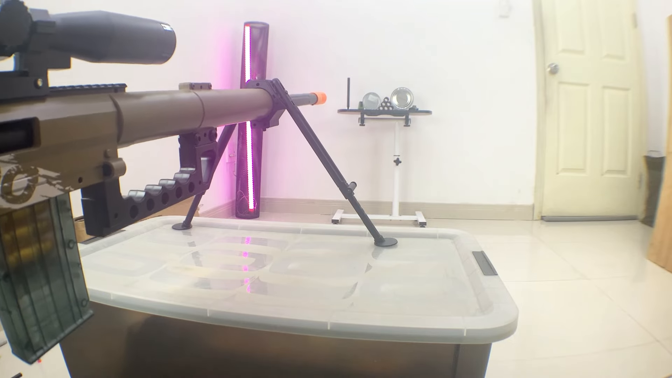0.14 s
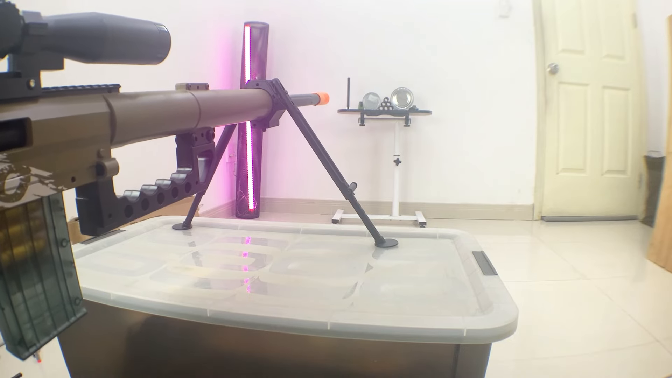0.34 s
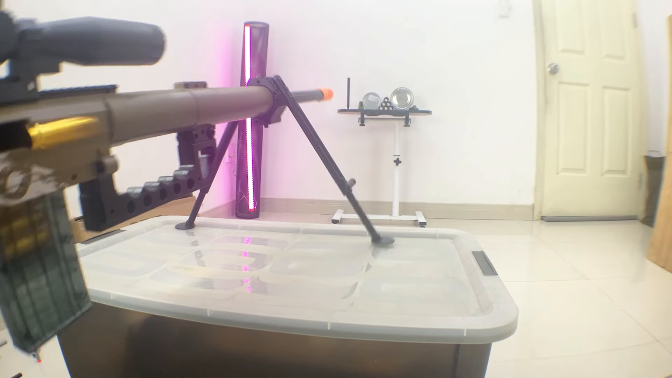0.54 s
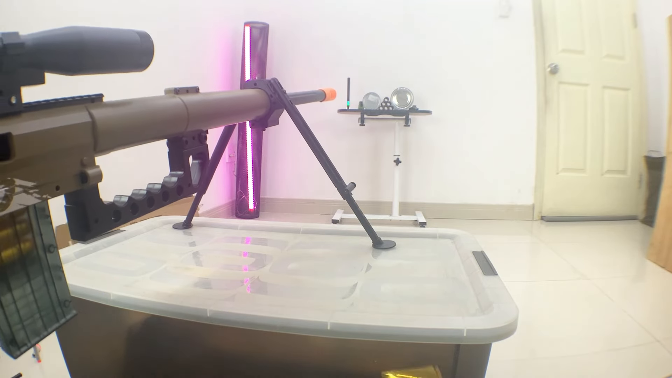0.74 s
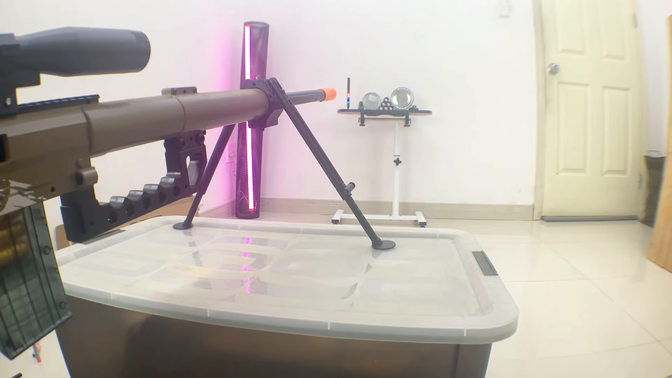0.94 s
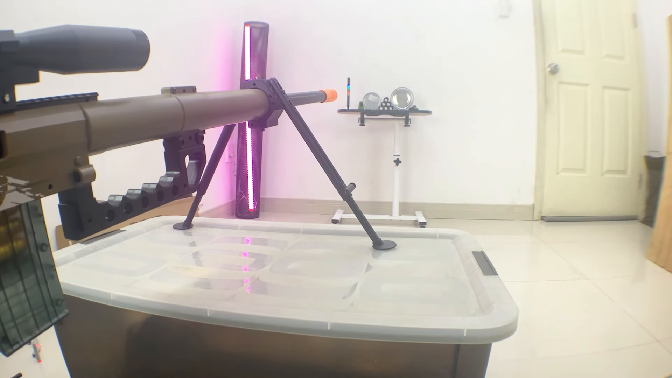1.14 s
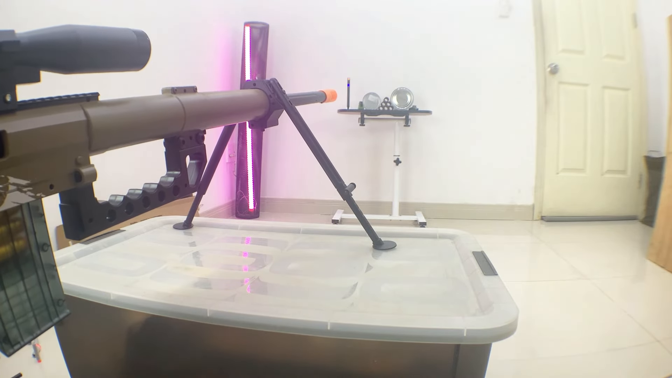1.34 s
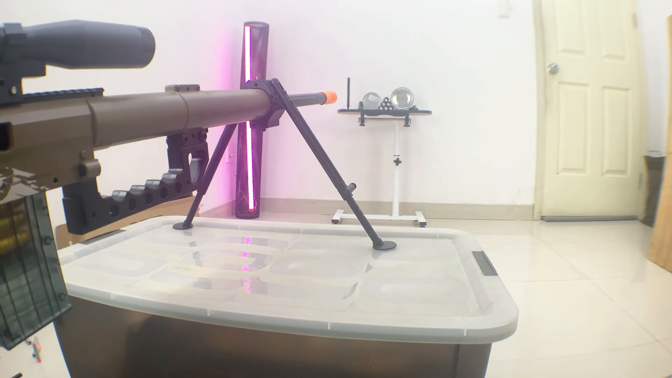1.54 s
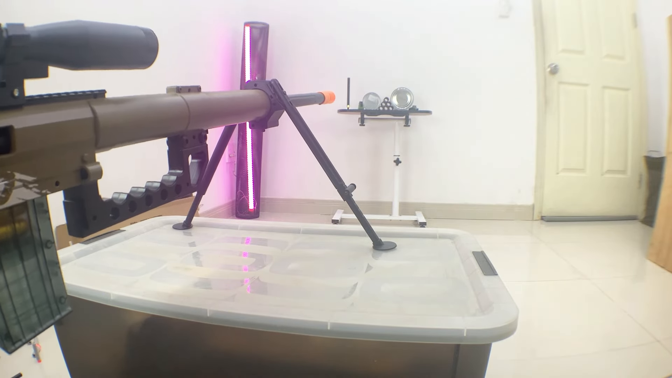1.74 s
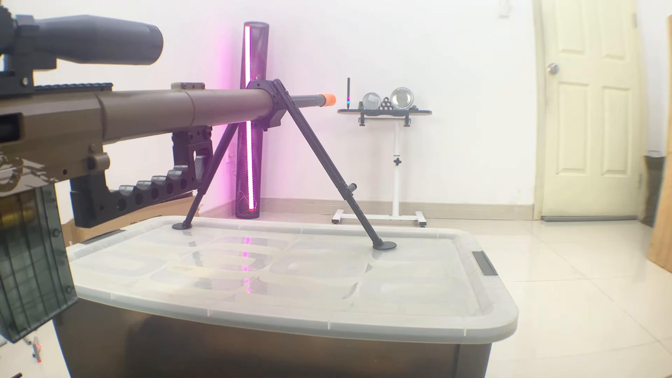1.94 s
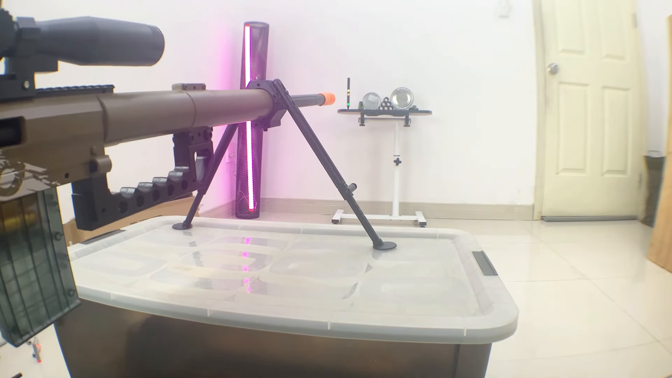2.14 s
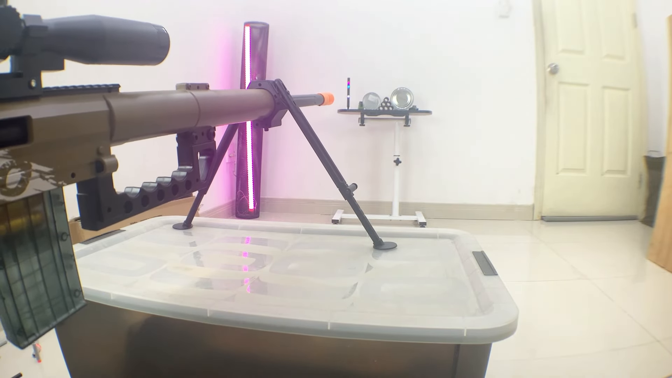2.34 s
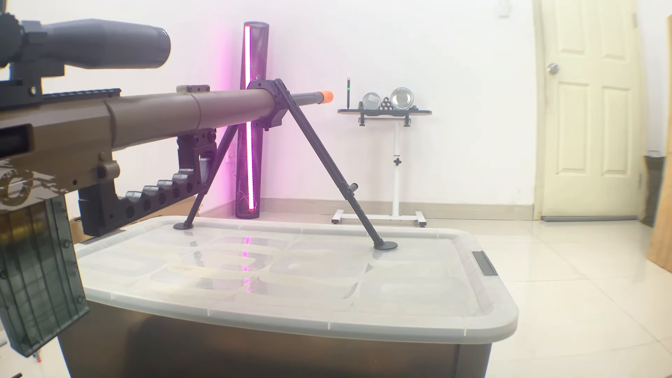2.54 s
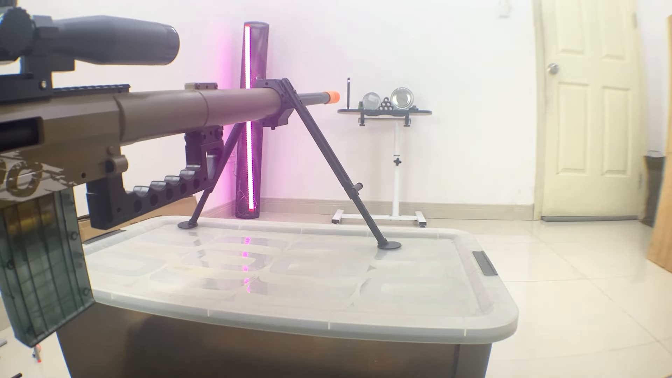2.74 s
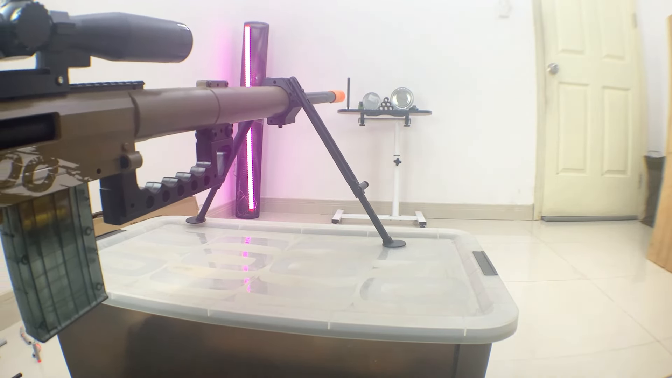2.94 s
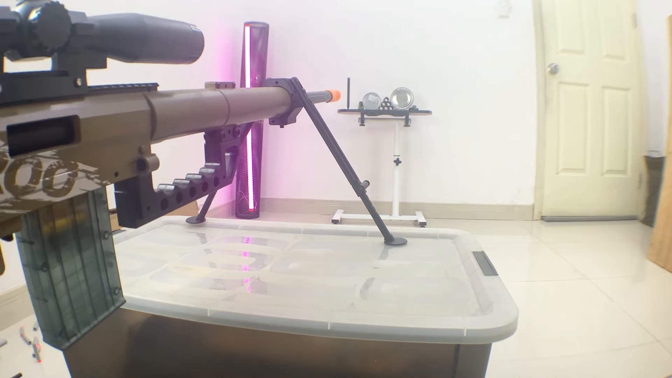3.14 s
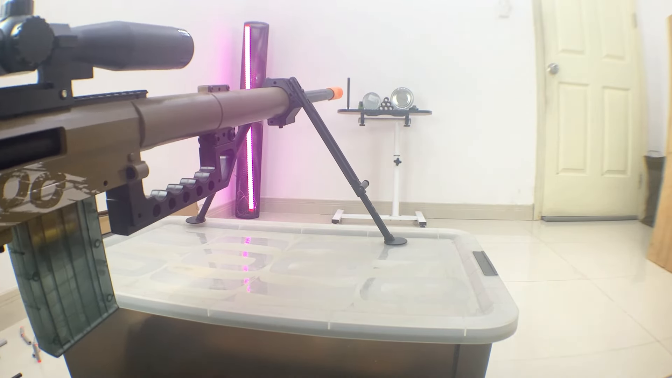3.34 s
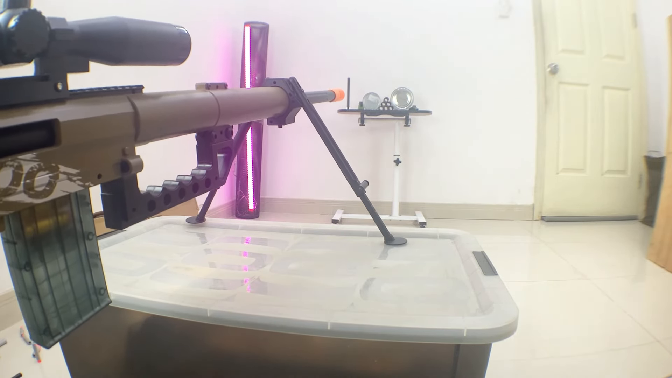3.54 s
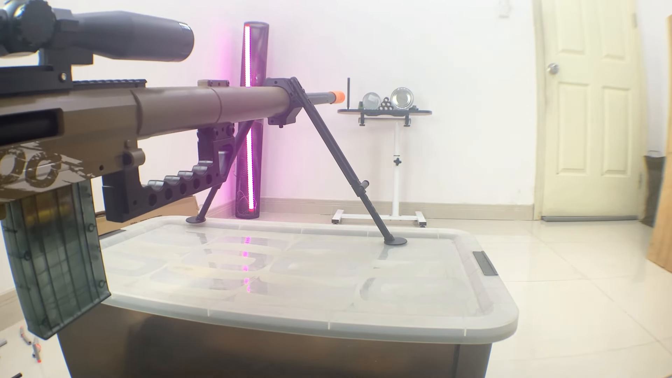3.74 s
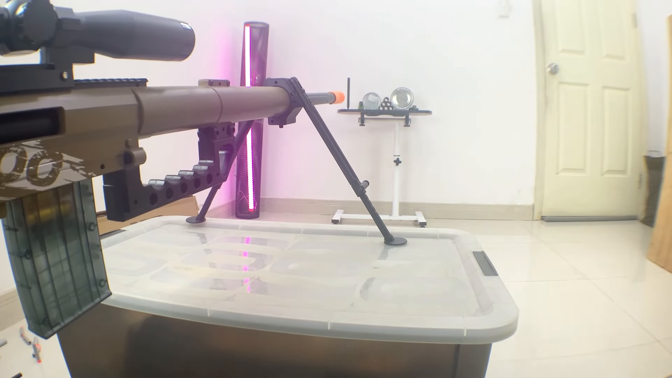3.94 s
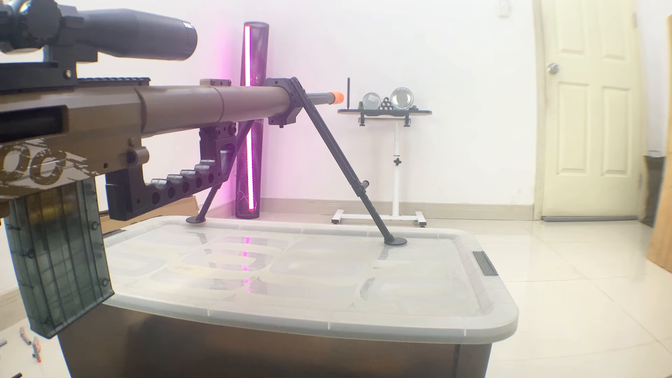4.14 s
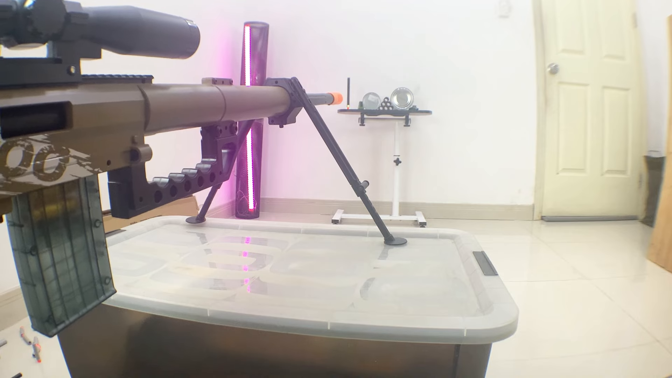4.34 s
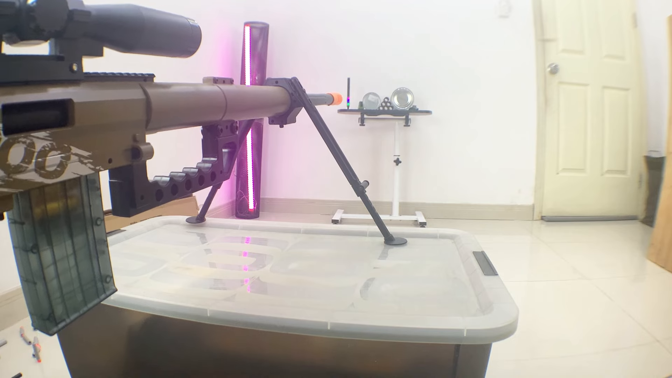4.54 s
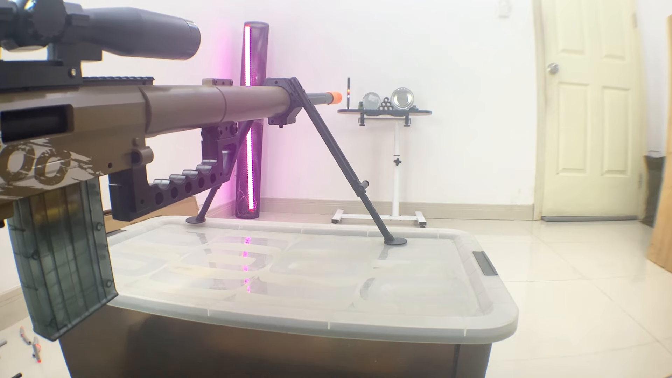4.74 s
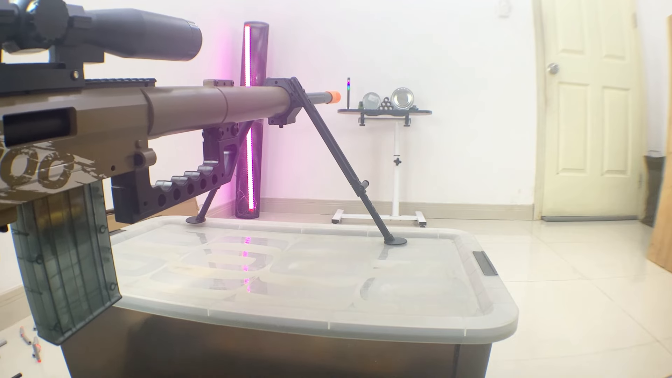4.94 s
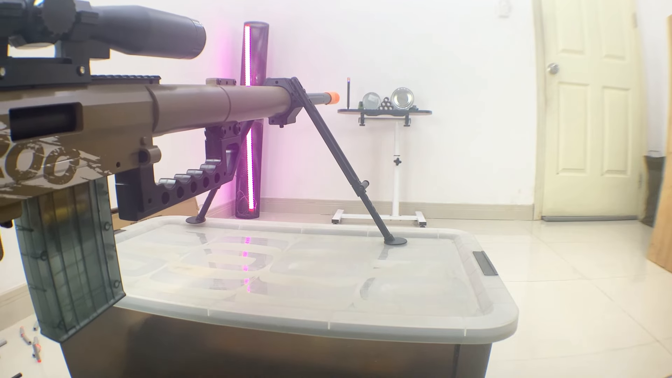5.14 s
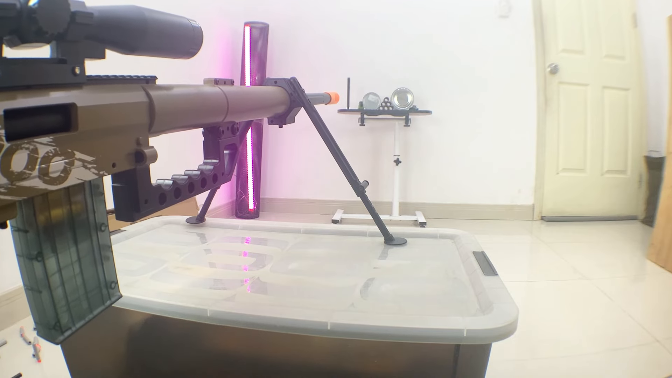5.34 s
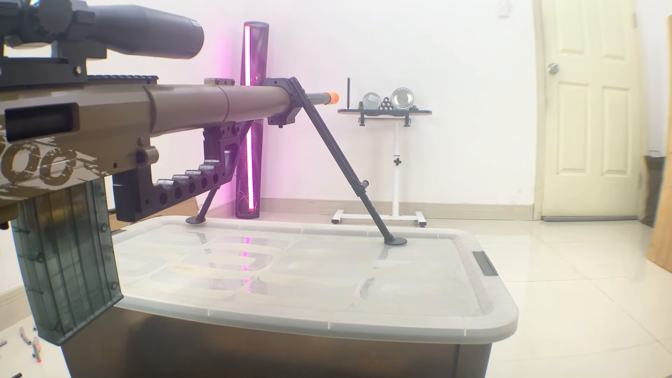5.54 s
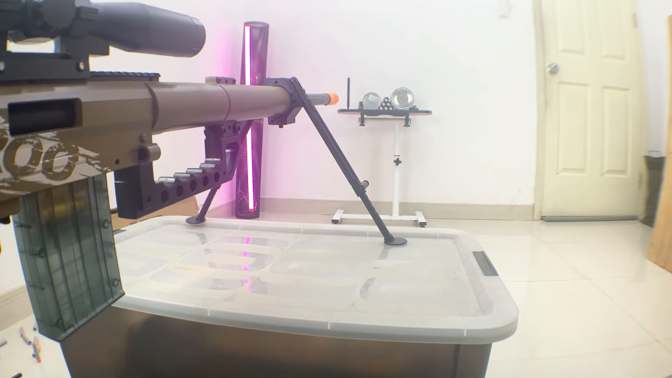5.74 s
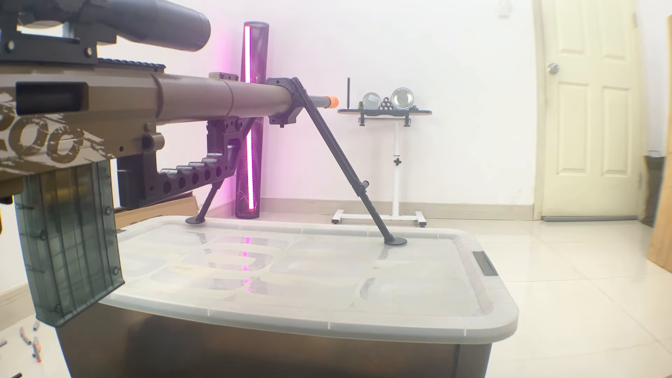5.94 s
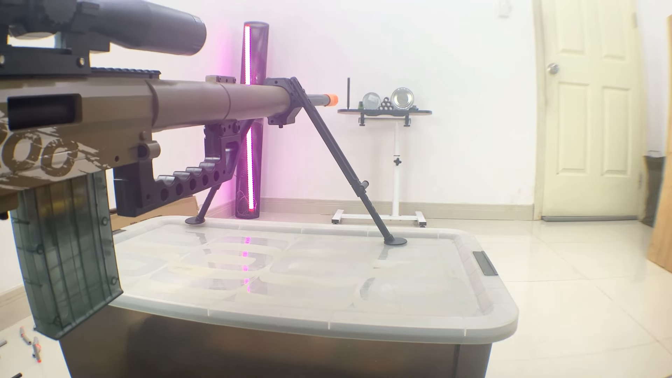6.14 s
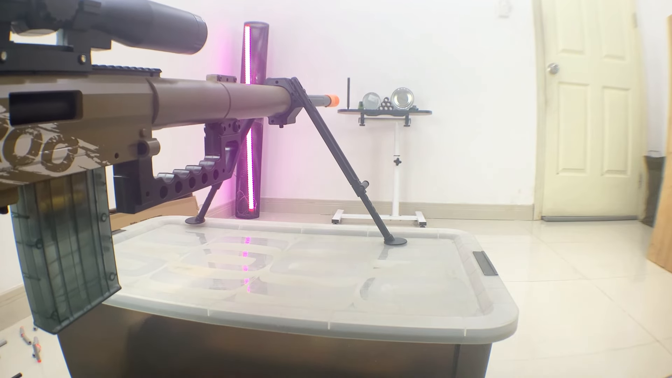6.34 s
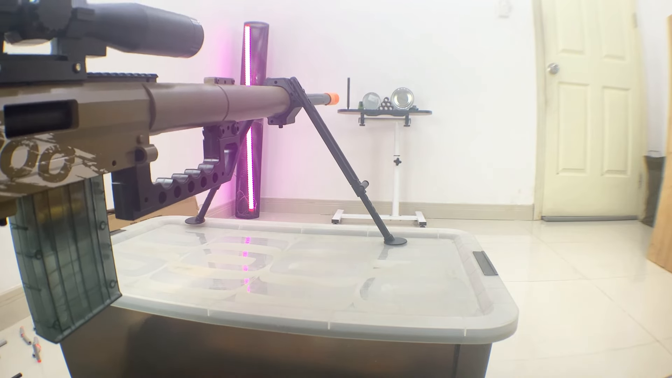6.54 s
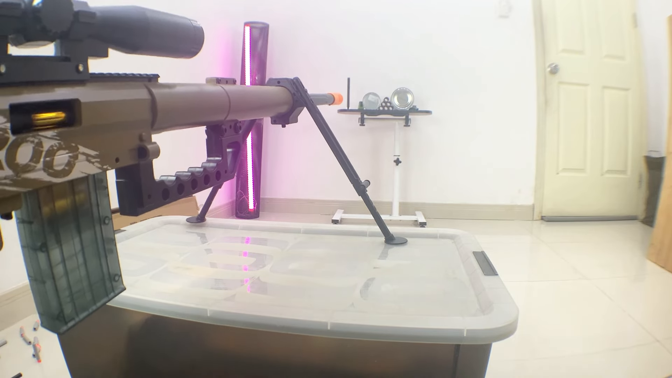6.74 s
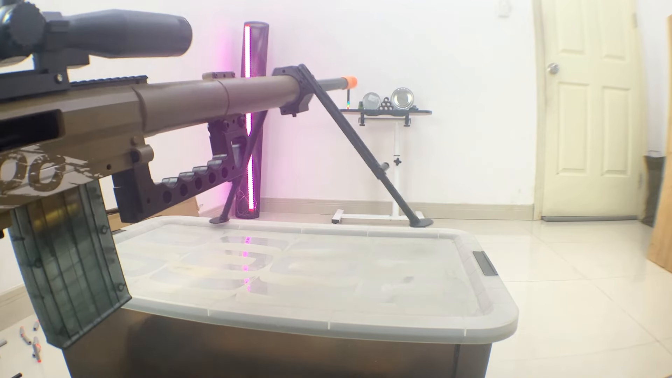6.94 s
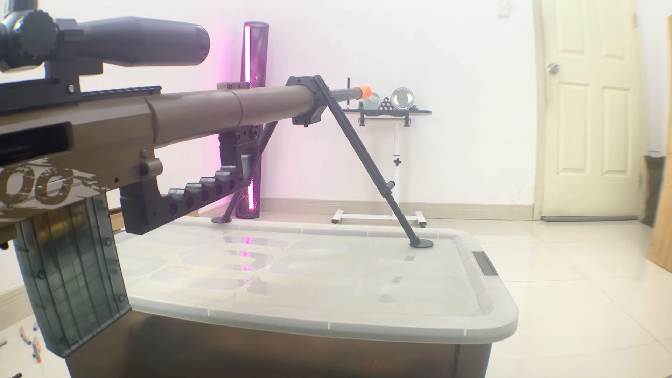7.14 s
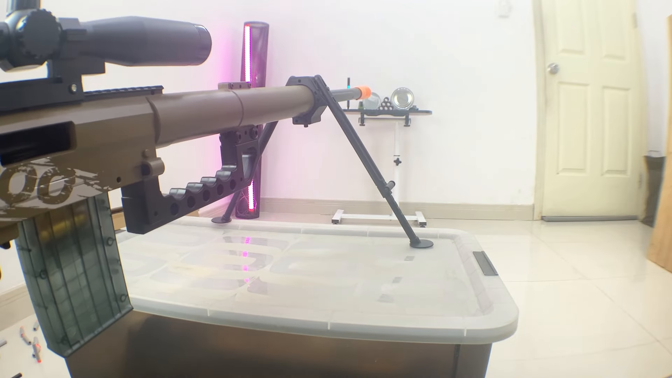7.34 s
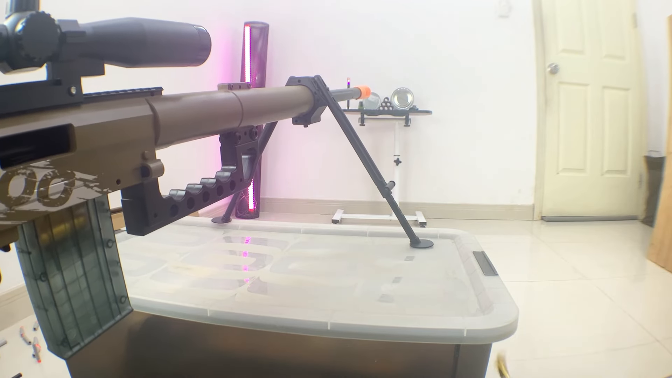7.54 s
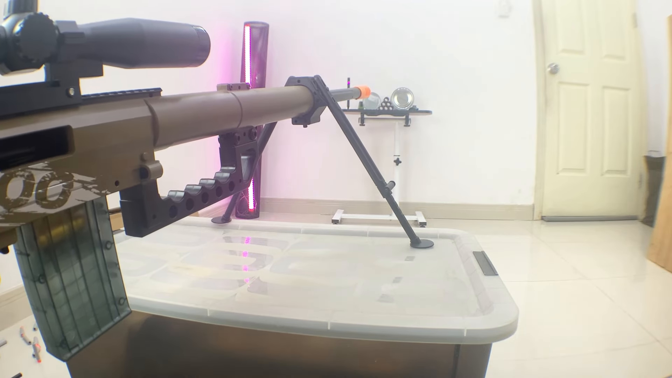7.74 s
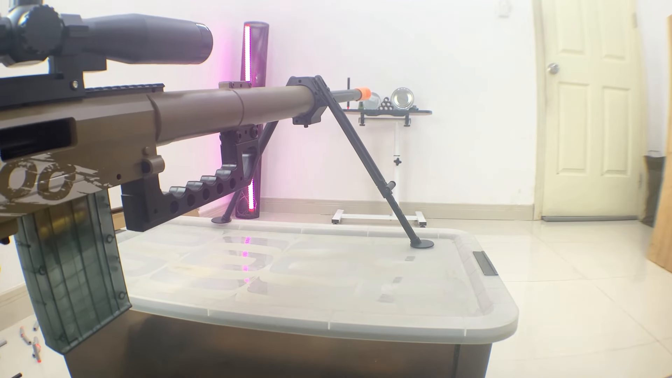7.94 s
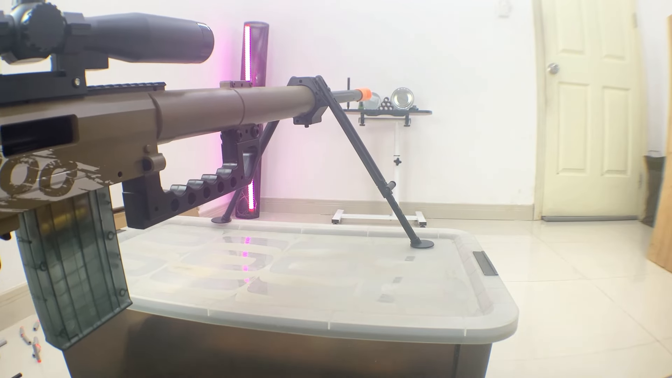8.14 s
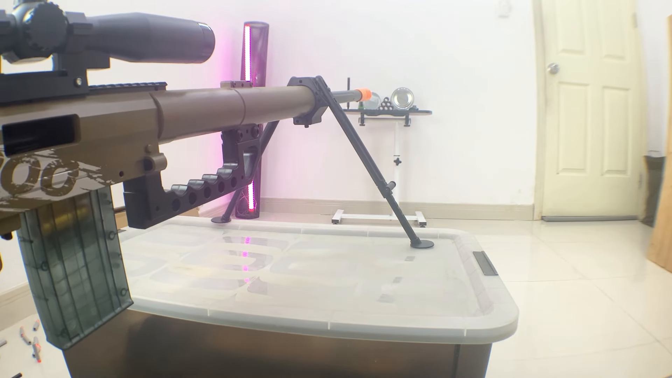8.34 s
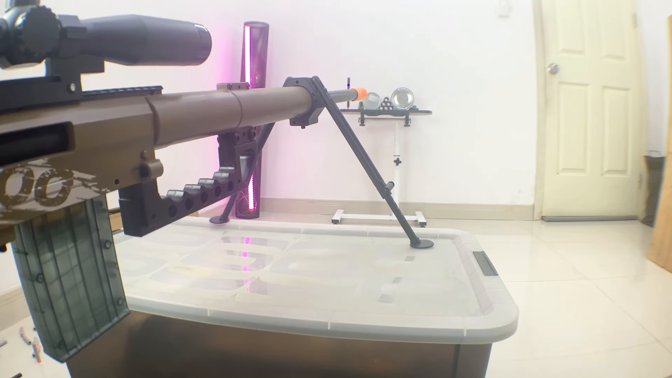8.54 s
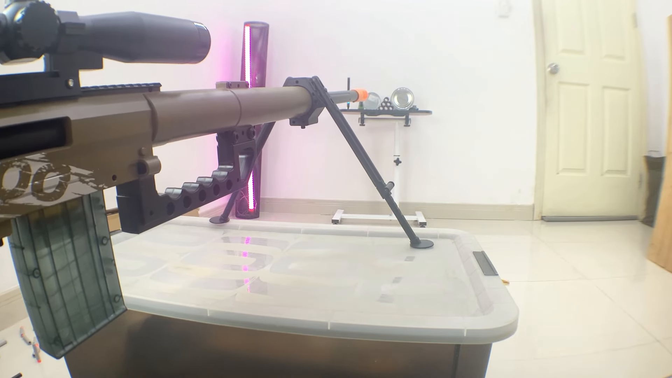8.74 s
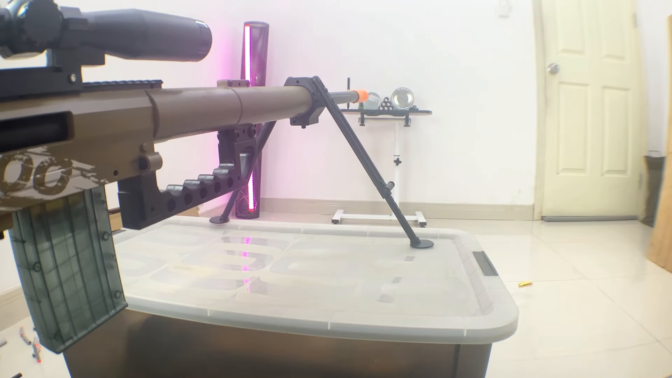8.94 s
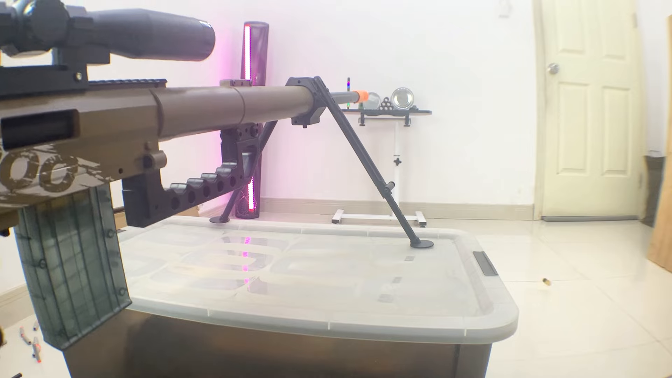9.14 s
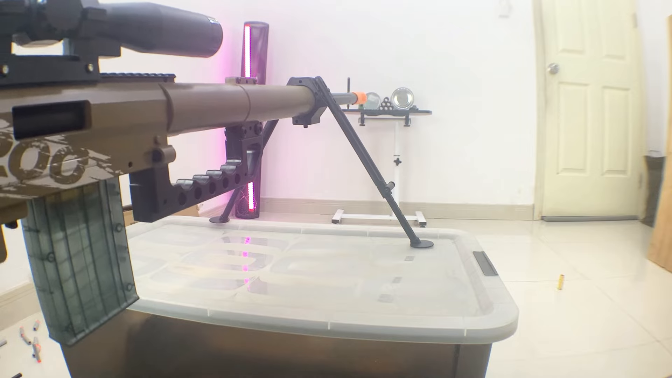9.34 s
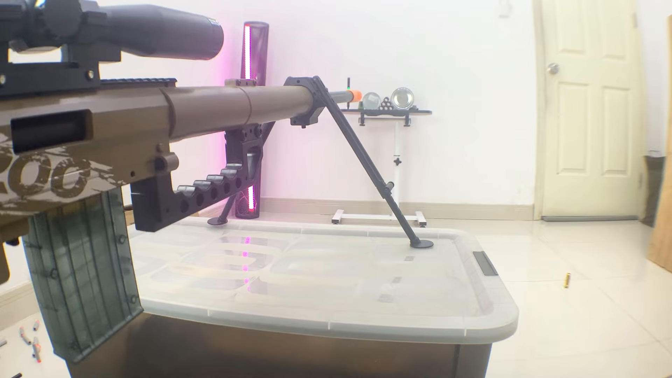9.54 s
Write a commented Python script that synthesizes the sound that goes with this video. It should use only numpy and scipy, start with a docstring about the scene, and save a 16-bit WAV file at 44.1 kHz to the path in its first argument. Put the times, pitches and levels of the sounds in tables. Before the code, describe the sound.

Two quick rounds of plastic bolt action, scraping to loud double clacks, shake a hollow box while small shells drop on hard tile and roll. Then comes one violent, distorted spring-powered shot, buzzing and singing as it fades, and a tiny distant dart landing. Later the handle chirps and the bolt is worked twice again, with brighter shell clinks and skids. Close microphone, lively bare room, low rumble.

```python
"""A bare tiled room with a low rumble, a toy dart rifle on a plastic box close to the microphone.
First its plastic bolt scrapes to its stop twice and clicks, the box thuds, and hollow shells drop and roll.
Then the sear snaps, the piston slams and overloads the microphone, the spring rattles and rings on,
and a dart taps down across the room. Last the handle squeaks, the bolt is worked twice more,
and more shells ring, skid and whirl on the tiles. Struck parts are noise bursts and damped modes."""
import sys
import numpy as np
from scipy import signal
from scipy.fft import rfft, irfft
from scipy.io import wavfile
from scipy.ndimage import uniform_filter1d, map_coordinates

SR = 44100
rng = np.random.default_rng(int(sys.argv[2]) if len(sys.argv) > 2 else 0)


def output_pcm(signal):
    """Save a mono or channel-first signal as 16-bit PCM at the path in sys.argv[1].

    Samples are clipped to [-1, 1] before scaling.
    """
    pcm = np.clip(np.atleast_2d(signal).T, -1, 1) * 32767
    wavfile.write(sys.argv[1], SR, np.round(pcm).astype(np.int16))


N = 427769


def amp(db):
    """Decibels to amplitude."""
    return 10 ** (np.asarray(db) / 20)


def unit(x):
    """Scale to rms 1."""
    return x / np.sqrt(np.mean(x ** 2) + 1e-20)


def along(points, hz):
    """Interpolate (hz, value) points on a log frequency axis."""
    f, v = np.transpose(points)
    return np.interp(np.log(hz + 1), np.log(f + 1), v)


def wobble(rate, size=N):
    """A smooth random curve, rate knots a second."""
    knots = rng.standard_normal(size // 10)
    return map_coordinates(knots, [np.arange(size) * rate / SR], mode="wrap")


def fade(t60, size):
    """An exponential decay that loses 60 dB in t60 seconds."""
    return amp(-60 * np.arange(size) / SR / t60)


def add(track, s, sound):
    """Mix a sound in at time s."""
    part = track[max(round(s * SR), 0):][:len(sound)]
    part += sound[:len(part)]


def placed(events):
    """A track holding each (s, sound) at its time."""
    track = np.zeros(N)
    for s, sound in events:
        add(track, s, sound)
    return track


def colour(x, points, size=2048):
    """Causal minimum-phase filter of unit energy, shaped by a (hz, level_db) spectrum."""
    magnitude = amp(along(points, np.fft.rfftfreq(size, 1 / SR)))
    cepstrum = irfft(np.log(magnitude + 1e-6))
    # fold the cepstrum forward in time so that the pulse starts at once
    cepstrum[1:size // 2] *= 2
    cepstrum[size // 2 + 1:] = 0
    pulse = irfft(np.exp(rfft(cepstrum)))
    return signal.oaconvolve(x, pulse / np.linalg.norm(pulse))[:len(x)]


def burst(t60, size=SR // 3):
    """A dying crackle with its spectrum evened out, so it has no pitch of its own."""
    x = np.sign(rng.standard_normal(size)) * fade(t60, size)
    spectrum = rfft(x, 2 * size)
    power = np.abs(uniform_filter1d(np.abs(spectrum) ** 2, size=120))
    even = irfft(spectrum / np.sqrt(power + 1e-9))[:size]
    return even * np.linalg.norm(x) / np.linalg.norm(even)


def tap(t60, crackle_db):
    """A clean push followed by fine crackle; as much energy as 1 ms at rms 1."""
    x = amp(crackle_db) * burst(t60) / np.linalg.norm(fade(t60, SR // 3))
    x[0] = 1
    return x / np.linalg.norm(x) * np.sqrt(SR / 1000)


def ring(modes, size=SR // 3):
    """Damped modes with a soft start and alternating signs, struck at slightly new strengths each time."""
    t = np.arange(size) / SR
    partials = np.zeros(size)
    for k, (hz, db, t60) in enumerate(modes):
        strength = (-1) ** k * amp(db + rng.standard_normal())
        partials += strength * fade(t60, size) * np.sin(2 * np.pi * hz * t)
    return partials * (1 - np.exp(-t / .0007))


def resonate(x, modes):
    """Drive modes with a continuing force; rms 1."""
    return unit(signal.oaconvolve(x, ring(modes))[:N])


def grit(rough_db, rate):
    """Friction noise whose strength wanders as it catches and slips; rms 1."""
    return unit(rng.standard_normal(N) * amp(rough_db * wobble(rate)))


def catches(rate, spread_db):
    """Tiny contacts at random moments and strengths, rate of them a second on average; rms 1."""
    hits = (rng.random(N) < rate / SR) * amp(spread_db * rng.standard_normal(N))
    return unit(signal.oaconvolve(hits, burst(t60=0.01))[:N])


def gesture(length, db, attack, sag_db, end_db):
    """An envelope that rises, sags for its length and is released; slopes in dB a second."""
    t = np.arange(SR) / SR
    sagging_db = db - sag_db * t
    return np.minimum(t / attack, 1) * amp(sagging_db - end_db * np.maximum(t - length, 0))


# friction grows as a power of speed, then dies in dB a second
SPEED_LAW, HALT_DB_PER_S = 1.79, 698


def push(length, db):
    """Friction level of a part that speeds up evenly over its length and then halts."""
    t = np.arange(SR // 2) / SR
    speed = np.minimum(t / length, 1)
    return speed ** SPEED_LAW * amp(db - HALT_DB_PER_S * np.maximum(t - length, 0))


# spectrum of the room noise: pitch_hz, level_db (relative)
ROOM_NOISE = [(20, 2), (50, -4), (80, -10.5), (110, -7), (160, -16.5), (230, -23.5), (330, -15), (470, -24),
              (650, -24), (1100, -29.5), (2500, -31), (4200, -29.5), (8400, -41.5), (16000, -48)]
# faint resonances in the room noise: pitch_hz, level_db (relative), t60_s
WHIR_MODES = [(596, -4.5, 0.037), (1510, -7, .03), (1740, -10, 0.028), (3264, 1.5, .018),
              (10800, -8, 0.0075)]


def floor():
    """Low rumble of shaped noise, and a faint airy whir of noise through damped modes."""
    rumble = colour(rng.standard_normal(N), ROOM_NOISE, size=16384)
    whir = resonate(rng.standard_normal(N), WHIR_MODES)
    return amp(-50.5) * rumble + amp(-63.5) * whir


# decay of the bare tiled room: pitch_hz, t60_s
ROOM_DECAY = [(100, 0.17), (400, 0.55), (1000, 0.52), (2500, 0.58), (5000, 0.56), (8500, 0.45),
              (12000, 0.38), (16000, 0.3)]


def room(x, gap=0.0043, build=0.005, size=SR // 4):
    """Bare walls answer after a short gap, with a new noise tail every quarter second; the deep bass dies
    soonest, and the treble sooner than the middle."""
    out = np.zeros(N)
    for start in range(0, N, size):
        hz, t, z = signal.stft(rng.standard_normal(SR), SR, nperseg=256)
        decay = amp(-60 * t / along(ROOM_DECAY, hz)[:, None])
        tail = signal.istft(z * decay, SR, nperseg=256)[1]
        tail *= np.clip((np.arange(len(tail)) / SR - gap) / build, 0, 1)
        add(out, start / SR, signal.fftconvolve(x[start:start + size], tail / np.linalg.norm(tail)))
    return out


DART_S = 4.975  # the spent dart lands across the room
# spectrum of the dart on landing: pitch_hz, level_db (relative)
DART_COLOUR = [(200, -30), (900, -16), (1400, -9), (1750, 2), (2200, -4), (2900, 2), (3700, -14),
               (5000, -6.5), (7000, -24), (11000, -18.5), (13000, -42), (16000, -50)]


def dart():
    """A light, hollow tap and a short skitter: one push with crackle, and a longer faint burst."""
    landing = amp(-16.5) * tap(t60=0.017, crackle_db=0)
    skitter = amp(-36) * burst(t60=.12)
    return placed([(DART_S, colour(landing + skitter, DART_COLOUR))])


# a moving shell slows, then comes to rest
COAST_ATTACK_S, COAST_SAG_DB_PER_S, COAST_END_DB_PER_S = 0.012, 14.5, 130
HOP_PER_S, HOP_DB = 22, -8  # small hops, relative to the steady sound


def coast(runs, rough_db, rate):
    """Level and force between the tiles and a moving shell: grit and small hops; the level fades as it slows."""
    level = placed(
        (s, gesture(length, db, COAST_ATTACK_S, COAST_SAG_DB_PER_S, COAST_END_DB_PER_S))
        for s, length, db in runs)
    hops = amp(HOP_DB) * catches(HOP_PER_S, spread_db=2)
    return level, unit(grit(rough_db, rate) + hops)


# shells land on the tiles: start_s, side_db, rim_db, air_ring_db (all relative),
# direct_db (path straight to the microphone, relative to what enters the room)
SHELL_LANDINGS = [(.895, -37, -17.5, -41, 2), (.904, -39.5, -28.5, -45, 6), (1.269, -25, -25.5, -60, 1.5),
                  (1.274, -13, -23.5, -55, 0), (1.884, -26.5, -51.5, -60, 0), (2.09, -28, -52, -60, 1),
                  (7.247, -20.5, -18, -32, 1.5), (7.512, -25, -22.5, -30, 1), (7.91, -5.5, -37, -58, 0),
                  (8.239, -39, -36, -34, 1), (8.255, -16.5, -23.5, -50, -5), (8.541, -40, -21.5, -27, -1.5),
                  (8.677, -47, -25, -45, -7), (8.862, -42, -27, -22.5, 0), (8.92, -49, -29, -40, 0.5),
                  (9.014, -43, -37, -33, -6), (9.262, -17, -26.5, -50, -8.5), (9.395, -46, -32, -43, -5),
                  (9.5, -46, -28, -40, -4.5)]
# the shell wall rings, landing on its side: pitch_hz, level_db (relative)
SIDE_COLOUR = [(150, -35), (700, -23.5), (1700, -32), (2600, -20.5), (4500, -8), (5600, -11), (7700, -7.5),
               (8250, -7), (8540, 7.5), (9100, -11), (10000, -22), (10700, -36), (11400, -38), (16000, -39)]
# the air column rings, landing on the rim: pitch_hz, level_db (relative)
RIM_COLOUR = [(150, -6), (700, -1.5), (2000, -5.5), (2480, 4.5), (3000, -9), (3600, -21), (4800, 0.5),
              (5220, -2.5), (5700, -7), (7300, -5.5), (7780, 4), (8150, -41), (8600, -7), (10800, -21.5),
              (11550, -13.5), (12500, -27.5), (16000, -28)]
# lingering modes of the air inside a shell: pitch_hz, level_db (relative), t60_s
AIR_COLUMN_MODES = [(2506, -9, 0.053), (5190, 1.5, 0.042), (7960, -18, .05)]
# a shell skids and chatters: start_s, length_s, level_db
SKID_RUNS = [(2.47, 0.12, -51), (8.26, 0.041, -41.5), (8.67, 0.32, -45), (9.27, 0.52, -47.5)]
# spectrum of skidding: pitch_hz, level_db (relative)
SKID_COLOUR = [(200, -26), (800, -13), (1900, -6.5), (2520, 3), (3200, -0.5), (4600, 1.5), (6000, -14),
               (9000, -24), (12000, -32), (16000, -44)]
# a shell rolls on its side: start_s, length_s, level_db
ROLL_RUNS = [(1.88, 0.61, -44.5), (2.47, 0.38, -48.5)]
# spectrum of rolling: pitch_hz, level_db (relative)
ROLL_COLOUR = [(200, -19.5), (800, -17), (1700, -19), (3000, -17), (4500, -2.5), (5600, -8), (7900, -5),
               (8520, 7.5), (9100, -17.5), (10300, -44), (11400, -26), (14000, -41)]
# a shell whirls on its open rim: start_s, length_s, level_db
WHIRL_RUNS = [(8.54, 0.65, -51), (9.395, .3, -44)]
# modes of the whirling shell: pitch_hz, level_db (relative), t60_s
WHIRL_MODES = [(2275, 0.5, 0.018), (5200, -2, 0.012), (7700, -21, .025), (8580, -18.5, 0.033)]


def shells():
    """Side landings ring the wall, rim landings the air inside; shells also skid, roll and whirl.
    Returns what reaches the microphone past the box, and what goes into the room."""
    direct, radiated = np.zeros(N), np.zeros(N)
    for s, side_db, rim_db, ring_db, direct_db in SHELL_LANDINGS:
        side = amp(side_db - 1.5) * colour(tap(t60=0.02, crackle_db=2), SIDE_COLOUR)
        rim = amp(rim_db - 1.0) * colour(tap(t60=0.024, crackle_db=7.5), RIM_COLOUR)
        landing = side + rim + amp(ring_db) * ring(AIR_COLUMN_MODES)
        add(radiated, s, landing)
        add(direct, s, amp(direct_db) * landing)
    skid_level, skid = coast(SKID_RUNS, rough_db=7, rate=250)
    roll_level, roll = coast(ROLL_RUNS, rough_db=4.5, rate=150)
    whirl_level, whirl = coast(WHIRL_RUNS, rough_db=2, rate=75)
    moving = skid_level * colour(skid, SKID_COLOUR)
    moving += roll_level * colour(roll, ROLL_COLOUR)
    moving += whirl_level * resonate(whirl, WHIRL_MODES)
    return direct + moving, radiated + moving


# the rifle bumps the box lid: start_s, thud_db, boom_db (relative), frame_knock_db
LID_BUMPS = [(.737, -26.5, -35, -42), (.751, -24, -31, -35), (.762, -25.5, -34, -35),
             (.833, -33, -40.5, -40), (1.664, -34.5, -56, -48), (2.049, -56, -45, -56),
             (2.93, -44, -55.5, -50), (7.034, -34, -48, -44), (7.074, -27.5, -49, -31.5),
             (7.109, -33, -47, -44), (9.517, -33, -47, -23.5), (9.538, -46, -42.5, -35)]
# modes of the box lid: pitch_hz, level_db (relative), t60_s
LID_MODES = [(111, -1, 0.21), (137.6, 5, 0.17), (187, -3, 0.081), (254, -0.5, 0.039), (360, -1.5, 0.082),
             (427, -9.5, 0.14), (617, -15, .06)]
# modes of the rifle's frame and bipod: pitch_hz, level_db (relative), t60_s
FRAME_MODES = [(425, -2, 0.073), (545, -1, .06), (1300, -12, .05)]


def box():
    """The hollow lid thuds and booms under the bipod, and the rifle's frame knocks."""
    out = np.zeros(N)
    thud_colour = [(40, -6), (130, -0.5), (450, -2.5), (900, -15), (3000, -44)]  # pitch_hz, level_db
    for s, thud_db, boom_db, knock_db in LID_BUMPS:
        thud = amp(thud_db) * colour(burst(t60=0.068), thud_colour)
        boom = amp(boom_db + 3.5) * ring(LID_MODES)
        knock = amp(knock_db) * ring(FRAME_MODES)
        add(out, s, boom + thud + knock)
    return out


# the bolt handle squeaks: release_s, length_s, pitch_hz, level_db,
# flick (half of the final upward flick, as a share of the pitch)
HANDLE_SQUEAKS = [(6.012, .025, 3070, -44, 0), (6.03, 0.021, 2990, -34.5, .1),
                  (6.08, 0.021, 3430, -40.5, .01), (6.098, .025, 3470, -46, .02)]
FLICK_S = .004  # the pitch flicks up as the contact lets go


def squeak(second_db=-19, third_db=-21):
    """Plastic sticks and slips in short chirps: three harmonics at an unsteady pitch."""
    t, out = np.arange(SR // 2) / SR, np.zeros(N)
    for s, length, hz, db, flick in HANDLE_SQUEAKS:
        let_go = flick * (1 + np.tanh((t - length) / FLICK_S - 1))
        pitch = hz * (1 + let_go + .02 * wobble(rate=500, size=len(t)))
        phase = 2 * np.pi * np.cumsum(pitch) / SR
        tone = np.sin(phase) + amp(second_db) * np.sin(2 * phase) + amp(third_db) * np.sin(3 * phase)
        flutter = amp(2.5 * wobble(rate=140, size=len(t)))
        add(out, s - length, push(length, db) * flutter * tone)
    return out


# spectrum of the plastic action: pitch_hz, level_db (relative)
PLASTIC_COLOUR = [(60, -39), (150, -16), (380, -11.5), (570, -2), (850, -3), (1140, -0.5), (1400, -4),
                  (1830, -2), (2300, -3), (3380, -2), (5300, -10.5), (9500, -17.5), (12000, -28),
                  (16000, -47)]


def clack(db, body_db, edge_db, t60):
    """One contact: a burst of plastic chatter and a short rattle of the housing."""
    hz, level = np.transpose(PLASTIC_COLOUR)
    tilt = along([(900, body_db), (2800, 0), (8000, edge_db)], hz)
    crack = tap(t60, crackle_db=15)
    housing = amp(-21) * burst(t60=0.11)
    return amp(db) * colour(crack + housing, np.c_[hz, level + tilt])


# latch, handle and breech click: start_s, level_db (over 1 ms), body_db (at 900 Hz and below),
# edge_db (at 8 kHz and above), t60_s
ACTION_CLACKS = [(.195, -38, -4, -9, .01), (.486, -30, 4, -.5, .02), (.517, -27, 2, -8, .025),
                 (0.5254, -12.5, -11, -1, .016), (.538, -21, 8, 5, .019), (.544, -22, 8, 8, .015),
                 (.7311, -22.5, 10, -4, 0.013), (.831, -13, 2.5, -2, 0.018), (1.6127, -34, -12, 1, .025),
                 (1.665, -21.5, 0, -4, .016), (1.677, -21.5, 8, -2, .028), (1.7569, -10.5, -1.5, -5, .016),
                 (2.0096, -15, 1, -1, 0.022), (2.4725, -33, -2, 8, 0.016), (2.87, -42, 10, 0, .035),
                 (2.931, -39, 16, 2, 0.032), (6.624, -37, 5, 4, 0.024), (6.713, -33, 7, -7, .03),
                 (6.75, -32, 4, -3, .03), (6.7747, -21, 1.5, 3, 0.021), (6.786, -22, 6, -1, .02),
                 (6.811, -21.5, -4, 6, 0.017), (6.83, -11, -10.5, -0.5, .02),
                 (7.0142, -13.5, -1, 11, 0.013), (7.0314, -16.5, 2, 9.5, 0.0096), (7.074, -29, 15, -1, .01),
                 (8.388, -32.5, 6, -7, .022), (8.399, -28.5, 3, -12, .035), (8.423, -22.5, 1, -17, 0.041),
                 (8.472, -22, 8, -1, .03), (8.5185, -18, -5, -10, .012), (9.038, -12, 0.5, 0, 0.019),
                 (9.518, -24, 11, -13, 0.039)]
# the handle locks down and rings the bolt: start_s, level_db
HANDLE_LOCKS = [(2.0092, -21), (7.0139, -19), (9.038, -17.5)]
# modes of the bolt: pitch_hz, level_db (relative), t60_s
BOLT_MODES = [(4000, -2.5, .022), (4400, 1.5, 0.026), (4730, -1, .02)]
# the hand shifts on the plastic: peak_s, length_s, level_db
HAND_RUBS = [(.22, .09, -50.5), (2.29, .02, -50.5), (2.487, .025, -47), (2.585, .02, -47.5),
             (2.881, .025, -48.5), (3.232, .02, -56.5), (5.26, .04, -54.5), (5.571, .01, -51),
             (6.119, .09, -52), (6.178, .05, -53.5), (8.521, 0.043, -29.5), (9.029, 0.093, -39.5)]
# the bolt is pushed until it hits its stop: arrival_s, travel_s, scrape_db, stop_db, body_db, edge_db
BOLT_STROKES = [(.557, 0.098, -27, -8.5, -8, 1), (1.738, 0.12, -28, -13, 2.5, 3),
                (6.879, 0.28, -33, -10.5, -8.5, 3.5), (8.489, .12, -36, -11.5, 1.5, 0)]
STOP_BOUNCE_S, STOP_BOUNCE_DB = .0035, -2.5  # the bolt kicks back and hits the stop again
CATCH_PER_S, CATCH_DB = 90, -2.5  # small catches along a stroke, relative to the grit


def action():
    """The bolt scrapes ever faster and hits its stop twice; latches click and the hand rubs in between."""
    out = placed((s, clack(db, body_db, edge_db, t60)) for s, db, body_db, edge_db, t60 in ACTION_CLACKS)
    out += placed((s, amp(db) * ring(BOLT_MODES)) for s, db in HANDLE_LOCKS)
    friction = placed((s - length, push(length, db)) for s, length, db in HAND_RUBS)
    for s, travel, scrape_db, stop_db, body_db, edge_db in BOLT_STROKES:
        add(friction, s - travel, push(travel, scrape_db))
        add(out, s, clack(stop_db, body_db, edge_db, t60=0.027))
        bounce = clack(stop_db + STOP_BOUNCE_DB, body_db, edge_db + 3.5, t60=0.018)
        add(out, s + STOP_BOUNCE_S, bounce)
    scrape = grit(rough_db=2.5, rate=350) + amp(CATCH_DB) * catches(CATCH_PER_S, spread_db=3)
    return out + friction * colour(unit(scrape), PLASTIC_COLOUR)


SLAM_S = 4.362  # the piston hits the cylinder head
# spectrum of the muzzle air, also heard in the rebounds: pitch_hz, level_db (relative)
AIR_COLOUR = [(88, -64), (150, -35.5), (398, 0), (475, -16), (589, -9.5), (637, -15.5), (774, -7),
              (1140, -17), (1690, -7), (1940, -13), (2450, -17), (4490, -11), (4950, -19.5), (6510, -16),
              (16000, -33)]
# modes of the spring tube: pitch_hz, level_db (relative), t60_s
TUBE_MODES = [(302, -8, .22), (330, 0.5, .28), (399, -3, 0.17), (420.8, -1, .3), (582, -8, .22),
              (686, -6.5, .2), (767, -6, .22), (985, -9, 0.29), (1332, -2, 0.36), (1560, -7.5, 0.19),
              (1674, 1, 0.24), (1726, -3, 0.24), (2200, -9, .14), (2674, -5.5, 0.15), (3900, -4.5, 0.11),
              (4160, -4.5, 0.14), (4540, -4.5, 0.15)]
# long ring of the coil: pitch_hz, level_db (relative), t60_s
COIL_MODES = [(330, -5, 1.2), (412, -3, 1.2), (844, -4, 1.45), (1340, -2, 1.3), (1750, -3.5, 1.3),
              (1800, -6, 1.5), (2120, -8, 1.4), (2730, -5.5, 1.4), (4172, -8, 1.6), (4770, -9.5, 0.78)]
# spectrum of the coil's rattle: pitch_hz, level_db (relative)
RATTLE_COLOUR = [(200, -29), (400, 0), (520, -20), (780, -8.5), (1150, -21), (1335, 3.5), (1520, -17),
                 (1730, -6), (2400, -12), (4400, -8.5), (7000, -25), (12000, -43)]
# the spring slaps its tube: period, first and last relative strength
REBOUND_S, REBOUND_DB, LAST_REBOUND_DB = .0232, 0.5, -3.5
SURGE_FIRST_S, SURGE_S = 4.558, .105  # a wave then runs up and down the coil: first return, period
SURGE_DB, SURGE_LOSS_DB, SURGE_T60 = -27.5, 6, 0.1  # rattle at each return, loss per trip, decay in s
SURGE_SLAP_DB, SURGE_SLAP_LOSS_DB = -31, 10  # the tube rings at each return, loss per trip
CHATTER_S, CHATTER_DB = .35, -41.5  # the coil buzzes between the returns: length, level


def spring(rebound_count=7, surge_count=4):
    """The spring slaps its tube in quick rebounds, then rattles each time its wave returns, and sings on."""
    out = np.zeros(N)
    for k, db in enumerate(np.linspace(REBOUND_DB, LAST_REBOUND_DB, rebound_count)):
        # every rebound but the first is slightly off the beat
        s = SLAM_S + k * REBOUND_S + min(k, 1) * .0015 * rng.standard_normal()
        slap = amp(db - 14) * ring(TUBE_MODES)
        puff = amp(db - 8) * colour(burst(t60=.03), AIR_COLOUR)
        add(out, s, slap + puff)
    buzz = gesture(CHATTER_S, CHATTER_DB, attack=.02, sag_db=6.5, end_db=117)
    rattle = placed([(SURGE_FIRST_S, buzz)])
    for k in range(surge_count):
        s = SURGE_FIRST_S + k * SURGE_S
        add(out, s, amp(SURGE_SLAP_DB - k * SURGE_SLAP_LOSS_DB) * ring(TUBE_MODES))
        add(rattle, s, amp(SURGE_DB - k * SURGE_LOSS_DB) * fade(SURGE_T60, SR // 3))
    add(out, SLAM_S, amp(-30.5) * ring(COIL_MODES, size=2 * SR))
    return out + colour(rattle * grit(rough_db=2.5, rate=110), RATTLE_COLOUR)


# the sear lets the piston go: start_s, level_db (relative), t60_s
SEAR_SNAPS = [(4.2573, -12.5, 0.15), (4.265, -6, 0.04), (4.274, -11.5, 0.29)]
# spectrum of the sear: pitch_hz, level_db (relative)
SEAR_SPECTRUM = [(35, -52.5), (60, -16.5), (149, -14.5), (268, -11.5), (308, -5), (354, -15), (553, 0),
                 (593, -8.5), (991, -10), (1780, -14.5), (3580, -7), (9790, -24), (16000, -46)]
BLAST_S, BLAST_DB = 0.15, -3.5  # air rushes from the muzzle: length, level
# the pressure rises, falls, then runs out
BLAST_ATTACK_S, BLAST_SAG_DB_PER_S, BLAST_END_DB_PER_S = .002, 117, 598.5


def shot():
    """The sear snaps, the piston slams home and drives out the air, and the spring rebounds."""
    out = np.zeros(N)
    for s, db, t60 in SEAR_SNAPS:
        add(out, s, amp(db - 2.5) * colour(burst(t60), SEAR_SPECTRUM))
    blast = gesture(BLAST_S, BLAST_DB, BLAST_ATTACK_S, BLAST_SAG_DB_PER_S, BLAST_END_DB_PER_S)
    pressure = placed([(SLAM_S, blast)])
    return out + spring() + pressure * colour(grit(rough_db=.5, rate=580), AIR_COLOUR)


def scene():
    """The rifle is near the microphone; the shells and the dart lie farther off and sound wetter."""
    bolt, thuds, bang, landing = action() + squeak(), box(), shot(), dart()
    shells_direct, shells_radiated = shells()
    near = amp(-6) * bolt + amp(-7.5) * thuds + amp(-7.0) * bang
    far = amp(-2.5) * shells_radiated + amp(-2.5) * landing
    walls = room(near + far)
    return (bolt + thuds + bang + landing + shells_direct + walls + floor())[None]


TOP_HZ = 16000  # band limit of the microphone


def record(dry, ceiling=.88, knee=4.6):
    """The microphone saturates on loud peaks such as the shot and cuts steeply above its band limit."""
    squashed = dry / (1 + np.abs(dry / ceiling) ** knee) ** (1 / knee)
    gain = 1 / np.sqrt(1 + (np.fft.rfftfreq(N, 1 / SR) / TOP_HZ) ** 200)
    return irfft(rfft(squashed) * gain, N)


dry = scene()
out = record(dry)
output_pcm(out)
```